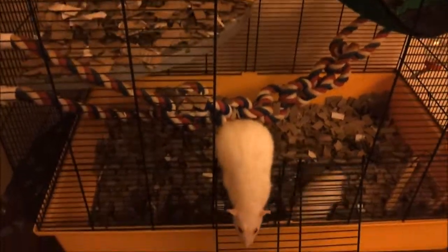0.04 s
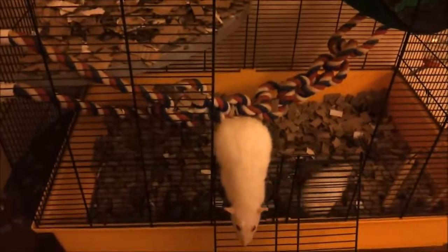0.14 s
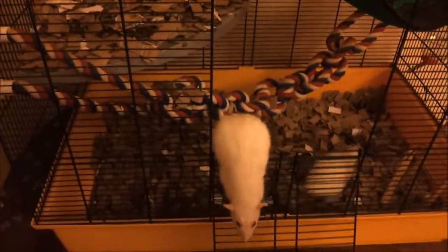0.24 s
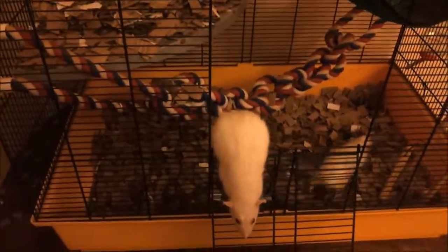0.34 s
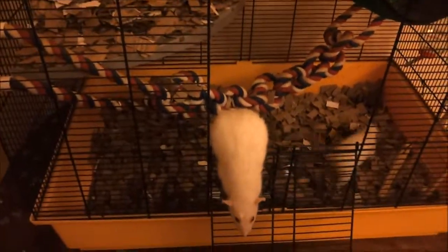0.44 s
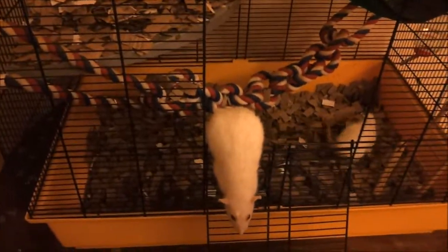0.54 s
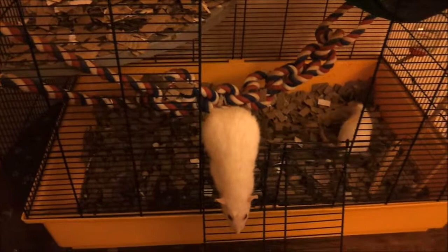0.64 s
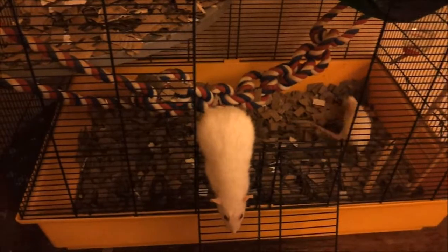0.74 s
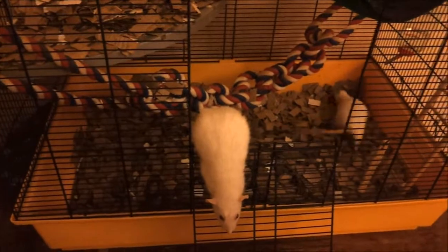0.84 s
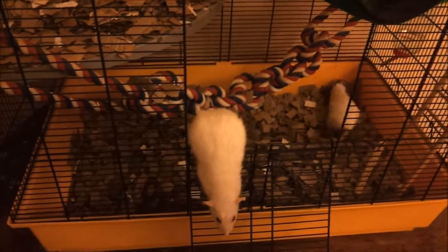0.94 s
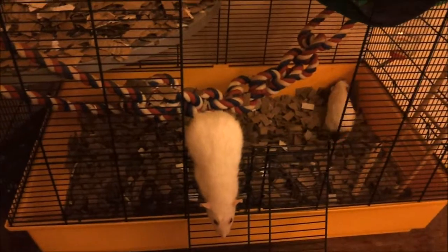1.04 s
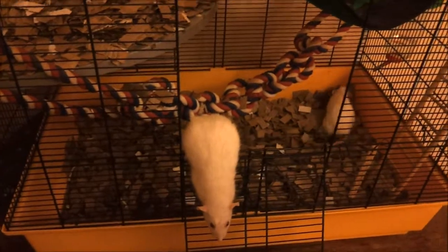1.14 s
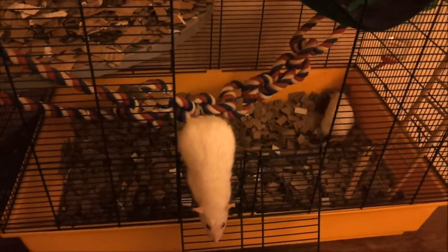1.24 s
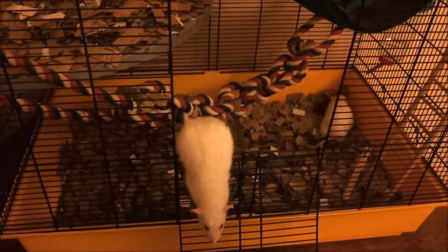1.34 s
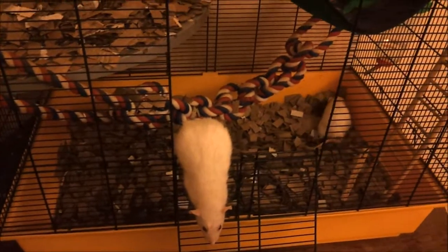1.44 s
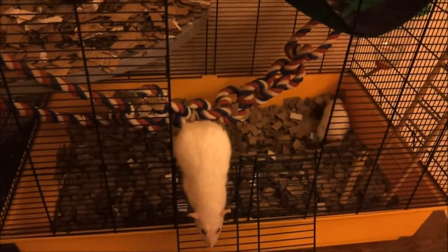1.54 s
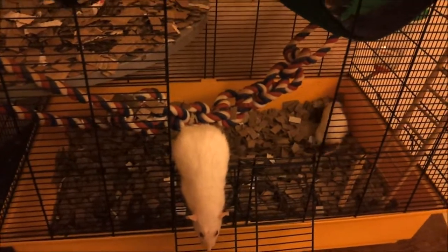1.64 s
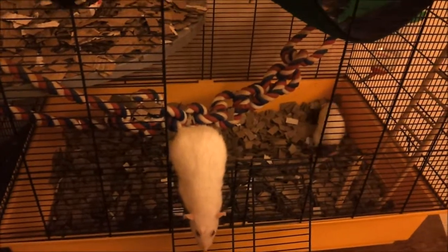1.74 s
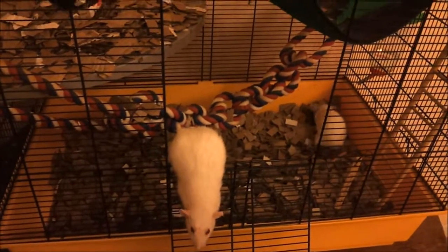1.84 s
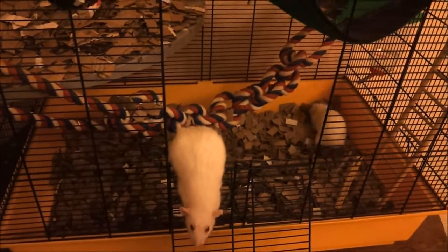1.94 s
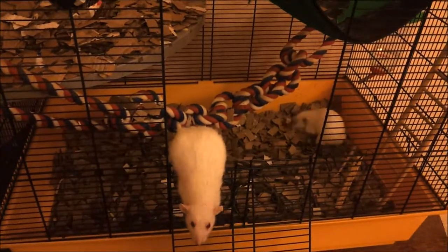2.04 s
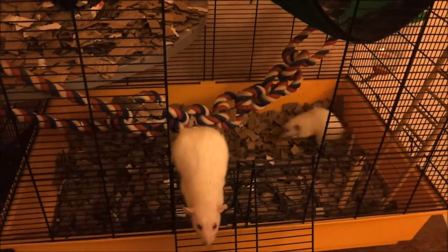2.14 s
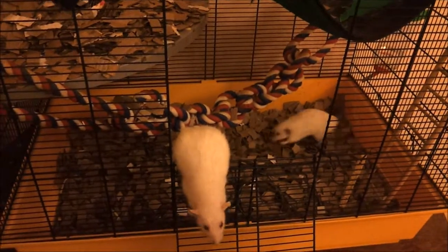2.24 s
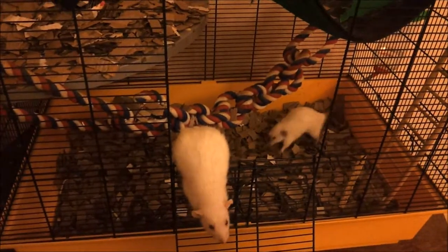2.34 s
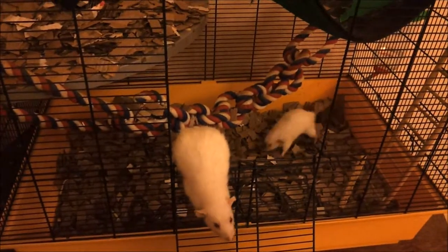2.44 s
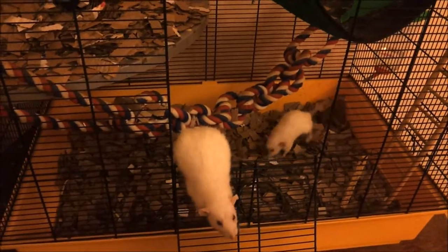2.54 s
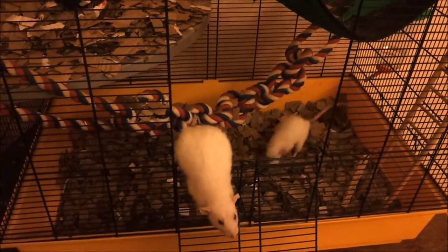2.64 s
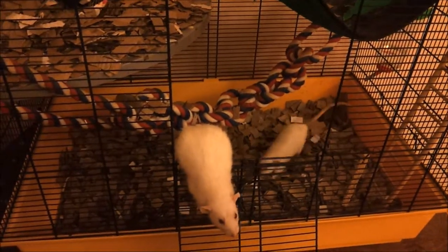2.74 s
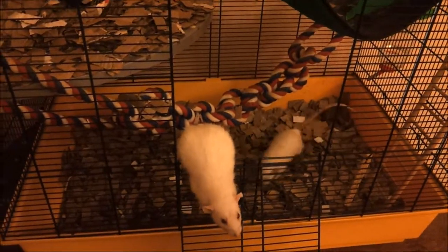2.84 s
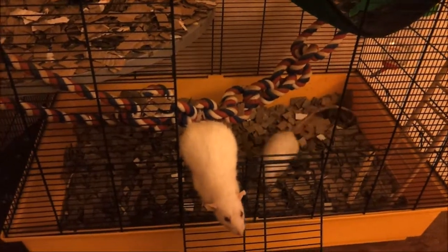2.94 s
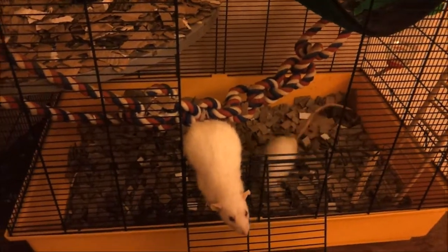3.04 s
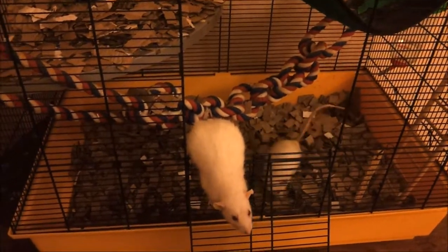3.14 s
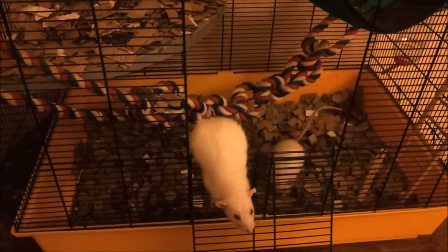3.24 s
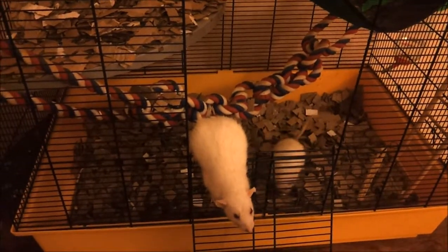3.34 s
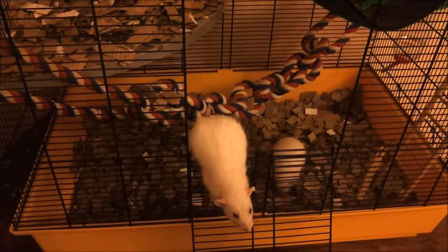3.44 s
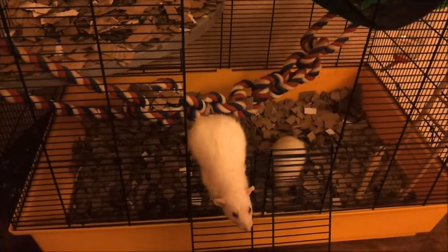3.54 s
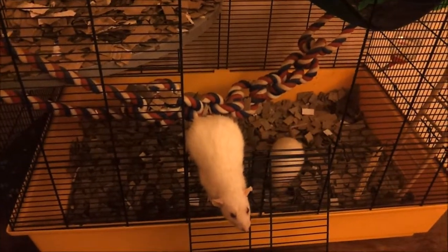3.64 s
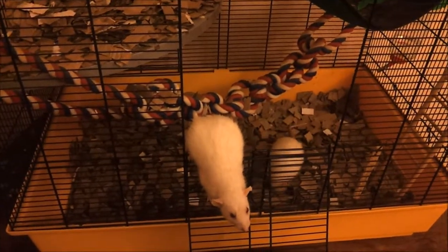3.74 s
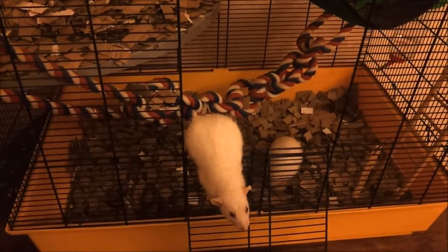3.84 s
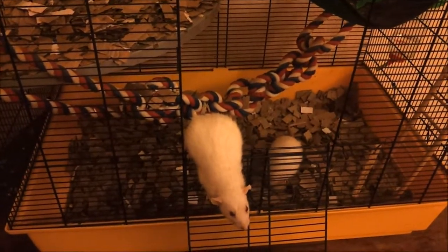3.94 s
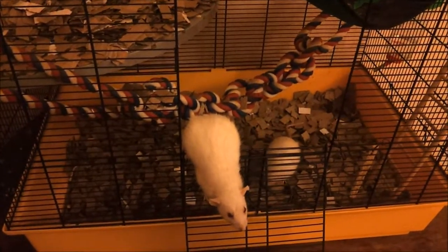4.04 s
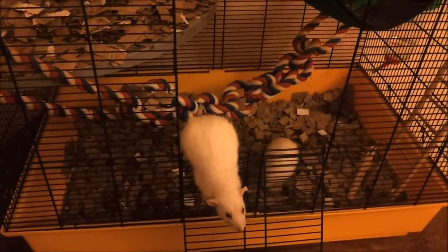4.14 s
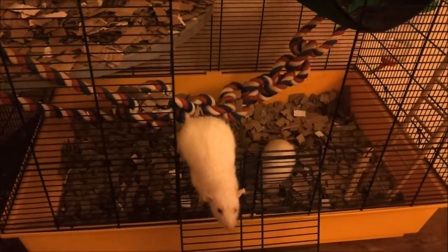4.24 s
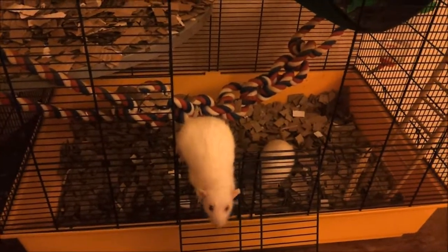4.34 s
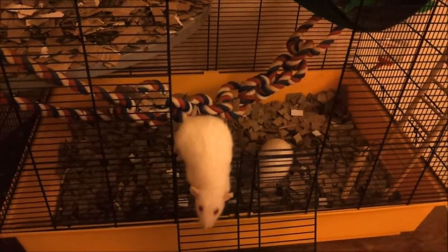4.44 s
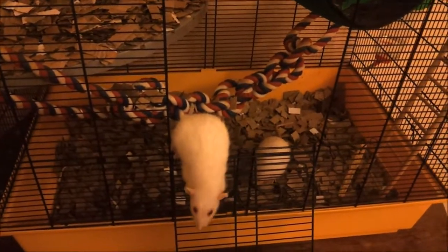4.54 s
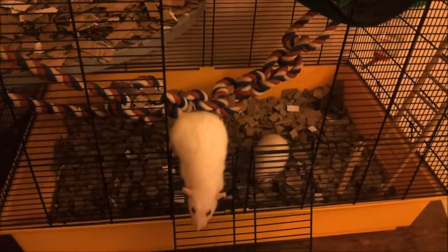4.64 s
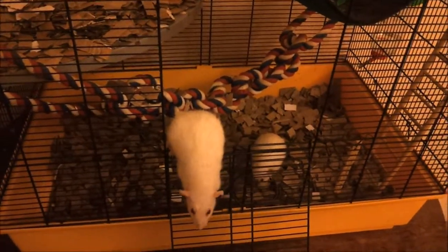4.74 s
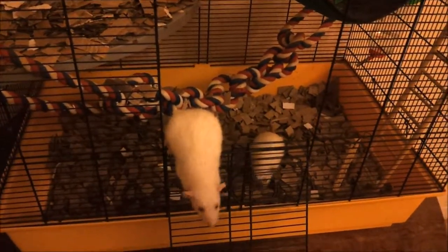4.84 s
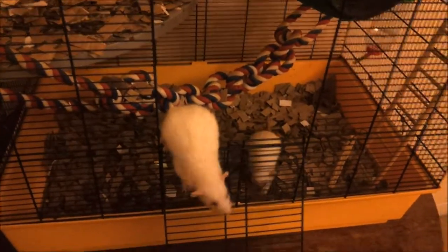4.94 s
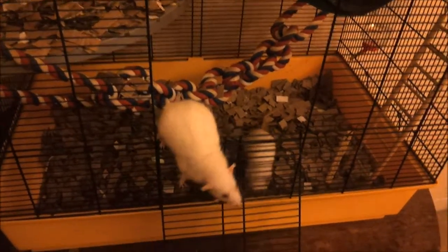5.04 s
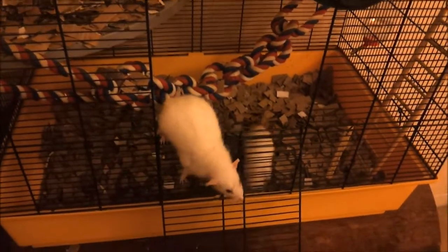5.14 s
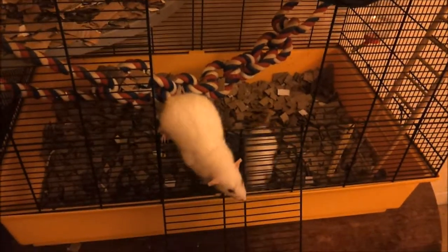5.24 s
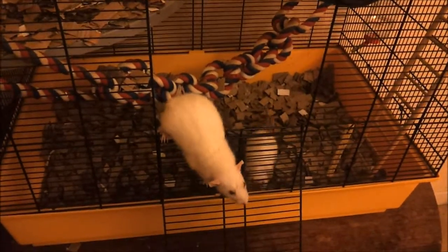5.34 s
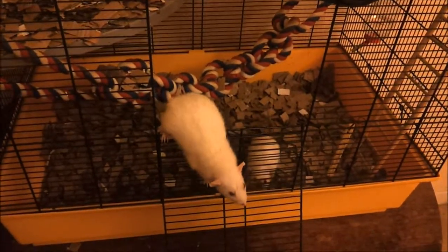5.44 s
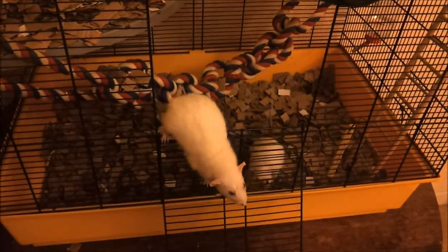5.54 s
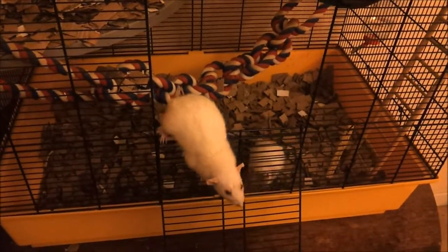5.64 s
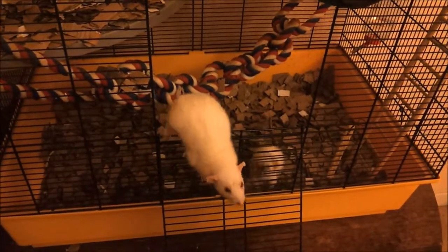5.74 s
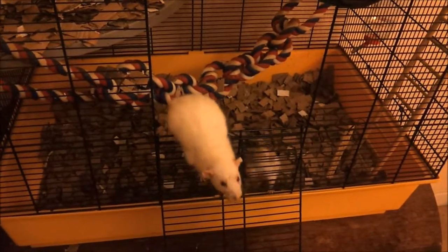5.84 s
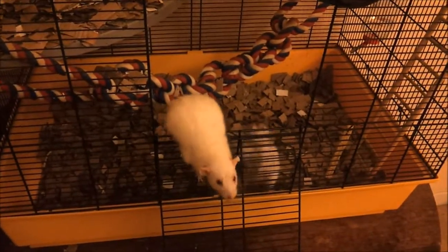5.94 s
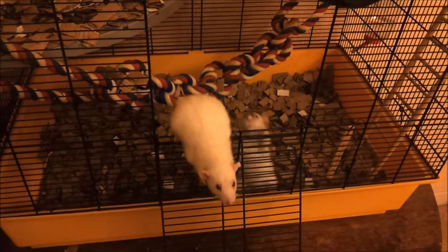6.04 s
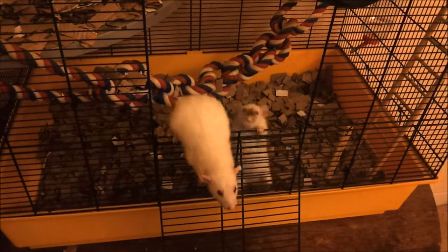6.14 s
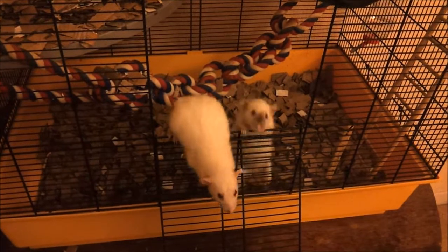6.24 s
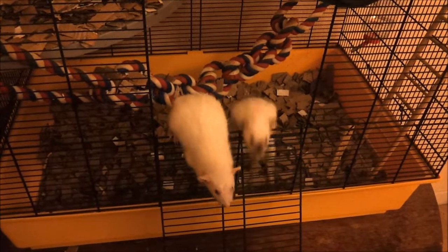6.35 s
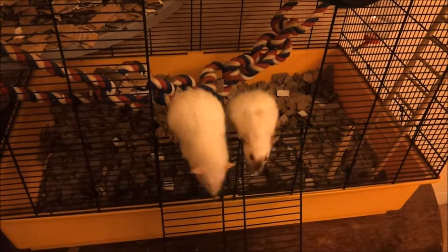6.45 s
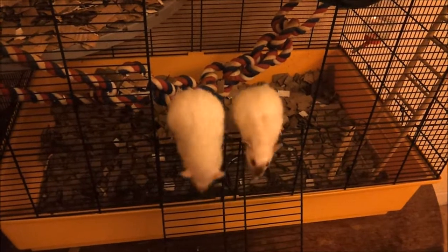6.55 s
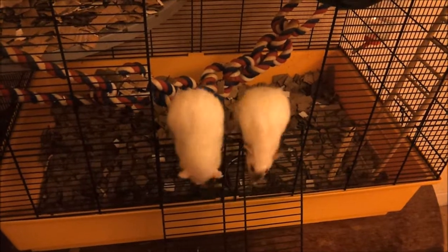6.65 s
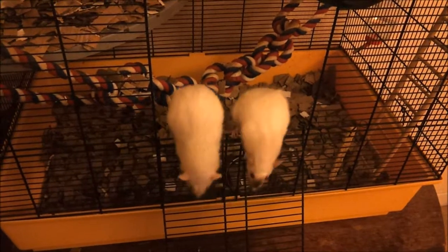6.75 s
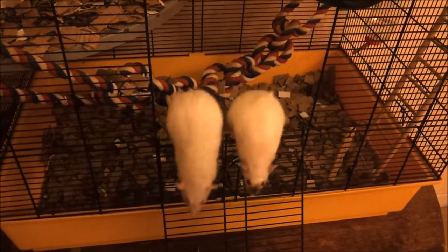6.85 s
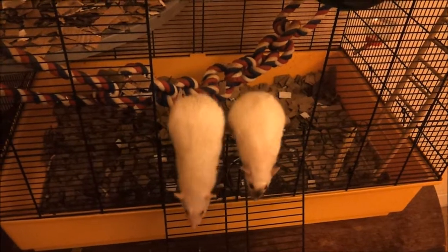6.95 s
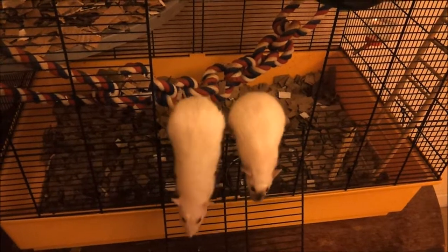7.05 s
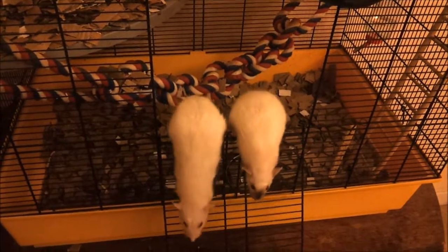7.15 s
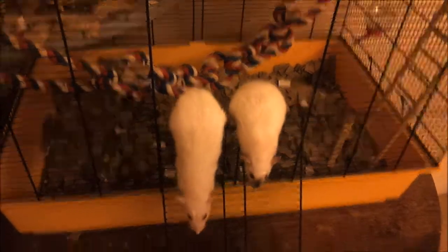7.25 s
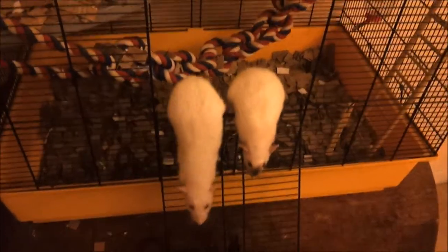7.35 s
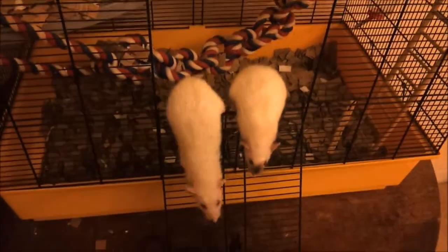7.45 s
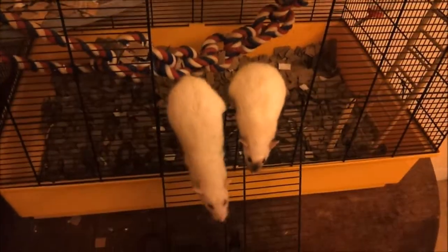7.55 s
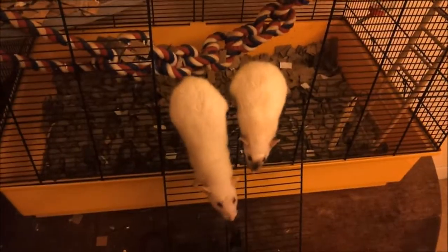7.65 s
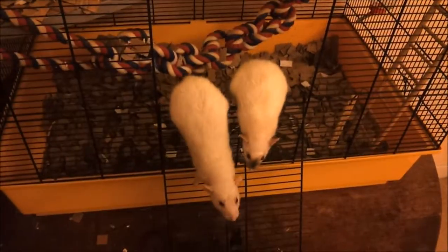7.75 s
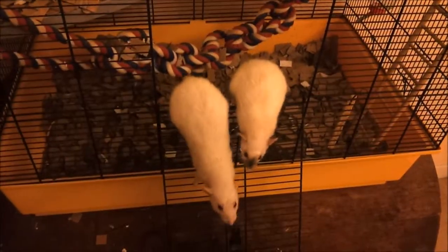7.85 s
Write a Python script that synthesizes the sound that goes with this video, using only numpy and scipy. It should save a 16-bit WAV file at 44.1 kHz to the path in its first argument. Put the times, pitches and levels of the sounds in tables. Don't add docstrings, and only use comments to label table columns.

```python
import sys
import numpy as np
from scipy import signal
from scipy.fft import rfft, irfft
from scipy.io import wavfile
from scipy.ndimage import uniform_filter1d

SR = 44100
rng = np.random.default_rng(int(sys.argv[2]) if len(sys.argv) > 2 else 0)


def put_to_file(sound):
    columns = np.atleast_2d(sound).T
    safe = np.clip(columns, -1, 1)
    whole_steps = np.round(safe * 32767)
    wavfile.write(sys.argv[1], SR, whole_steps.astype(np.int16))


def field_ratio(decibels):
    return 10 ** (np.asarray(decibels, dtype=float) / 20)


N = 348390

# (frequency [Hz], level [dB per Hz])
CHIP_COLOUR = [(900, -31), (1700, -14.5), (3100, -14.5), (3600, -11), (4100, -7.5), (6000, -3.5),
               (7000, -7.5), (9000, -9.5)]


def evened(x):
    return x / np.sqrt(np.mean(x ** 2) + 1e-20)


def add(mix, s, sound):
    part = mix[round(s * SR):][:len(sound)]
    part += sound[:len(part)]


def coloured(x, points):
    f, db = np.transpose(points)
    hz = np.fft.rfftfreq(len(x), 1 / SR)
    gain_db = np.interp(np.log(hz + 1), np.log(f + 1), db)
    return irfft(rfft(x) * field_ratio(gain_db), len(x))


def column(table, index):
    return np.interp(np.arange(N) / SR, [row[0] for row in table], [row[index] for row in table])


def wander(width):
    return evened(uniform_filter1d(uniform_filter1d(rng.standard_normal(N), width), width))


def crackle(per_s, spread_db):
    size = field_ratio(spread_db * np.minimum(rng.exponential(1, N), 5))
    sign = rng.choice([-1., 1.], N)
    return evened(size * sign * (rng.random(N) < per_s / SR))


def drone(table):
    turns = np.cumsum(column(table, 1) * (1 + .04 * wander(3000))) / SR
    return np.sqrt(2) * field_ratio(column(table, 2) - 0.6) * np.sin(2 * np.pi * turns)


def room():
    # (frequency [Hz], level [dB per Hz])
    hush = [(12, -42.5), (20, -7), (31, -4), (54, -5), (113, -3.5), (185, -5), (262, -6.5), (452, -8.5),
            (511, -10.5), (860, -11), (949, -12.5), (2490, -18.5), (5230, -21), (6540, -29.5), (7400, -35),
            (9620, -61), (16300, -120)]
    # (frequency [Hz], width [Hz], level [dB])
    room_modes = [
        (121.4, 13, -64.5),
        (190.3, 15, -64.5),
    ]
    # (time [s], pitch [Hz], level [dB])
    low_engine = [(0, 53.8, -62), (1.93, 48.9, -61.5), (2.15, 44.8, -66.5), (3.2, 45.6, -63.5),
                  (3.5, 45.6, -60), (4.2, 44.8, -67), (4.42, 44.4, -56), (4.7, 43.6, -62), (5.1, 41.8, -51),
                  (5.45, 43.8, -60), (5.6, 43.2, -70), (5.87, 44.1, -58.5), (6.25, 43.5, -59.5),
                  (6.4, 48.3, -66), (7.3, 50.3, -67), (7.9, 42, -70)]
    high_engine = [(0, 66, -67), (1.9, 68, -67), (2.2, 71, -68), (3.0, 69, -58), (3.25, 70, -65),
                   (3.5, 71, -58), (3.9, 68, -75), (4.15, 68, -56), (4.5, 68, -65), (5.6, 69, -65),
                   (6.3, 71, -75), (7.15, 72, -61), (7.4, 71, -66), (7.66, 70, -52), (7.9, 70.7, -67)]
    hush_db = -52
    out = field_ratio(hush_db - 1.92) * evened(coloured(rng.standard_normal(N), hush))
    for hz, width, db in room_modes:
        b, a = signal.iirpeak(hz, hz / width, SR)
        out += field_ratio(db) * evened(signal.lfilter(b, a, rng.standard_normal(N)))
    return out + drone(low_engine) + drone(high_engine)


def fills():
    # (time [s], lower edge [Hz], upper edge [Hz])
    swells = [(1.675, 6200, 7600), (2.07, 6200, 7600), (2.165, 6200, 7600), (2.955, 5100, 7000),
              (3.65, 4600, 5800), (4.49, 6200, 7500), (4.765, 5700, 7000), (4.885, 6200, 7600),
              (5.37, 5140, 6300), (7.0, 6920, 7600), (7.555, 4600, 6300)]
    level_db, length = -69, 2048
    out, envelope = np.zeros(N), np.sin(np.pi * np.arange(length) / length)
    for s, lo_hz, hi_hz in swells:
        edges = [(.97 * lo_hz, -80), (lo_hz, 0), (hi_hz, 0), (1.01 * hi_hz, -80)]
        band = coloured(rng.standard_normal(length), edges)
        add(out, s - .023, field_ratio(level_db) * envelope * evened(band))
    return out


def bumps():
    # (time [s], peak level [dB], pitch [Hz], length [cycles])
    touches = [(4.95, -30.5, 243, 0.74), (5.058, -39.5, 221.5, 1.6), (5.089, -41.5, 228, 1.2),
               (6.822, -44, 169, 1.2), (7.2277, -42, 239, 1.1), (7.2534, -40.5, 374, 2.3),
               (7.274, -36, 330, 0.96), (7.297, -41, 240, 1), (7.3011, -33.5, 350, 0.6),
               (7.324, -47, 262, 1.2), (7.388, -40, 300, 1), (7.4, -26.5, 237, 1),
               (7.401, -30.5, 690, 0.71), (7.2655, -43, 262, 1), (7.285, -46, 200, 1.1),
               (7.3285, -42, 330, 1.1), (7.37, -49, 300, 1.1)]
    out, t = np.zeros(N), np.arange(1500) / SR
    for s, db, hz, cycles in touches:
        swing = np.sin(2 * np.pi * hz * t) * np.exp(-(hz * t / cycles) ** 3)
        add(out, s, field_ratio(db) * swing)
    return out


def knocks():
    # (time [s], peak level [dB], centre of the struck modes [Hz], ring [factor on the decay])
    blows = [(1.449, -40, 2280, 0.62), (2.414, -41, 1530, 0.69), (2.421, -47, 1460, 0.7),
             (2.425, -44, 200, 0.85), (2.43, -27, 2100, 0.66), (2.456, -38, 357, 0.56),
             (3.093, -35, 790, 0.4), (3.104, -43.5, 744, 0.36), (3.121, -39.5, 253, 0.6),
             (5.65, -42, 389, 1), (5.679, -36.5, 500, 1), (5.88, -32, 1300, 0.6), (5.892, -35.5, 390, 2.1),
             (5.937, -37, 990, 0.5), (5.978, -34.5, 2200, 1), (5.979, -41, 900, 0.34),
             (6.045, -39, 1500, 0.34), (6.052, -36, 700, 0.44), (6.3805, -17.5, 1330, 0.5),
             (6.381, -30, 2900, 0.35), (6.384, -28, 184, 0.22), (6.383, -19.5, 415, 0.34),
             (6.386, -21.5, 900, 0.38), (6.385, -25, 616, .6), (6.396, -31, 560, 0.84),
             (6.424, -37, 560, 0.67), (6.402, -27.5, 420, 0.43), (6.412, -34, 850, .7),
             (6.422, -41, 1070, 0.99), (6.636, -40, 2300, 0.63), (6.407, -34.5, 180, .3),
             (6.432, -43, 1550, 0.89), (6.442, -34, 1050, .6), (6.452, -45, 300, 0.89),
             (6.472, -45, 704, 0.76), (6.487, -48.5, 563, 0.66), (6.494, -42, 170, 0.39),
             (5.4, -45.5, 333, 1.7), (5.52, -44, 407, 1.4), (5.664, -38, 2070, 1.1), (5.674, -42, 760, .8)]
    # (frequency [Hz], level [dB], t60 [s])
    door_modes = [(143, -4, 0.31), (189, 0, 0.14), (300, -9, 0.049), (404.5, -8.5, 0.19),
                  (499, -10.5, 0.11), (559, -7, 0.063), (674, -4.5, 0.034), (760, -12.5, 0.087),
                  (847, -5, 0.06), (1016, -9, 0.085), (1275, -7, 0.034), (1370, -6.5, 0.026),
                  (1480, -13.5, 0.031), (1650, -5, 0.033), (1960, -4, 0.028), (2080, -9, 0.047),
                  (2177, -4, 0.042), (2640, -4, 0.067), (3090, -5, 0.049), (3420, 2, 0.048)]
    out, t = np.zeros(N), np.arange(9000) / SR
    hz, mode_db, t60 = np.transpose(door_modes)[:, :, None]
    for s, db, centre_hz, ring in blows:
        spot = rng.standard_normal((len(door_modes), 3))
        weight_db = mode_db - 7.3 * np.log2(hz / centre_hz) ** 2 + 1.3 * spot[:, :1]
        loaded_hz = hz * (1 + .015 * spot[:, 1:2])
        decay = field_ratio(weight_db - 60 * t / (t60 * max(ring, .05)))
        modes = decay * np.sin(2 * np.pi * loaded_hz * t + 2 * spot[:, 2:])
        contact = np.minimum(t * centre_hz / 0.69, 1)
        blow = modes.sum(axis=0) * contact
        add(out, s, field_ratio(db) * blow / abs(blow).max())
    return out


def paws(index):
    # (time of the push [s], rustle level [dB], length [s], level of drag on the tray [dB])
    pushes = [(0.238, -39, 0.14, -50), (0.347, -37, 0.064, -48), (0.454, -39, 0.045, -58),
              (0.523, -38, .09, -52), (0.605, -43.5, 0.14, -64), (0.677, -43, 0.077, -54),
              (0.756, -53, 0.049, -62), (0.872, -42, .13, -54), (0.977, -43.5, 0.091, -56),
              (1.315, -41, 0.095, -56), (1.338, -42, 0.025, -55), (0.273, -44, .04, -59),
              (0.2, -47, .06, -54), (1.457, -45, 0.045, -67), (1.545, -49, .07, -59),
              (1.969, -51.5, .05, -65), (2.103, -50.5, .04, -61), (2.222, -45.5, 0.084, -54),
              (2.349, -71, 0.049, -55), (2.429, -34, 0.061, -47), (2.57, -43, 0.033, -54),
              (2.618, -39, 0.017, -48.5), (2.699, -37.5, 0.098, -49.5), (2.742, -41, 0.071, -49.5),
              (2.822, -41.5, 0.085, -57), (2.914, -44, 0.077, -63), (3.062, -42, 0.05, -54),
              (3.121, -43, 0.11, -47), (3.572, -52.5, 0.093, -59),
              (4.964, -52, 0.16, -55.5), (5.17, -51.5, 0.21, -54), (5.41, -49, .05, -54),
             (5.652, -56, 0.13, -45.5), (5.676, -35, 0.066, -41), (5.894, -39.5, 0.055, -47),
             (5.938, -36.5, 0.02, -44), (5.984, -40.5, 0.14, -46.5), (6.073, -48.5, 0.11, -55.5),
             (6.358, -47, 0.032, -49), (6.378, -39, .04, -50), (6.418, -47, 0.13, -43),
             (6.638, -57.5, 0.22, -52), (7.395, -64, 0.089, -51)]
    rise_share = 0.45
    t = np.arange(0, N / SR + .002, .001)
    steps = np.array(pushes).T[:, :, None]
    push, length = steps[0], steps[2]
    away = np.maximum((push - t) / rise_share, (t - push) / (1 - rise_share)) / length
    level = np.linalg.norm(field_ratio(steps[index] - 10 * away), axis=0)
    return np.interp(np.arange(N) / SR, t, level)


def drag():
    # (frequency [Hz], level [dB per Hz])
    tray_colour = [(90, -35.5), (180, -8.5), (400, -3), (700, -8.5), (1050, -6.5), (1550, -15),
                   (2200, -15.5), (3000, -19.5), (4500, -57.5)]
    idle_db = -60.5
    slips = crackle(per_s=2500, spread_db=1.5)
    return field_ratio(-6.5) * np.hypot(field_ratio(idle_db), paws(3)) * evened(coloured(slips, tray_colour))


def rustle():
    # (time [s], rustle level [dB])
    stir = [(0.0, -51), (0.13, -49), (0.72, -52.5), (1.06, -57.5), (1.22, -51), (1.61, -62), (2.12, -57.5),
            (2.5, -53.5), (3.0, -52), (3.25, -61), (3.52, -55), (3.63, -62), (4.07, -64), (4.86, -61.5),
            (5.24, -64.5), (5.59, -51), (5.85, -55), (6.16, -64.5)]
    grains = crackle(per_s=6000, spread_db=1.3) * field_ratio(1.6 * wander(300))
    return field_ratio(-2.5) * np.hypot(field_ratio(column(stir, 1)), paws(1)) * evened(coloured(grains, CHIP_COLOUR))


def snaps():
    # (time [s], peak level [dB], pitch [Hz], low tick relative to the peak [dB])
    clean_snaps = [(0.0463, -28, 5400, -33), (0.504, -31.5, 5900, -18), (0.5135, -30, 4390, -23),
                   (0.528, -31, 4750, -20), (0.5378, -25, 5740, -25), (0.5547, -24, 5950, -14),
                   (0.624, -34.5, 5920, -25), (0.9585, -31, 6800, -18), (0.9647, -43.5, 5900, -22),
                   (0.2705, -38, 6270, -20), (0.356, -38.5, 5800, -16), (0.2195, -37, 4270, -20),
                   (0.495, -36.5, 6450, -18), (0.588, -39, 5700, -20), (0.6117, -40, 6150, -8),
                   (0.738, -40, 5000, -10), (0.8395, -42, 5100, -15), (1.344, -38, 5900, -19),
                   (1.66, -51, 6040, -14), (1.805, -45.5, 5000, -22), (3.0405, -37, 4570, -1),
                   (3.598, -47, 3500, -5), (5.9825, -36, 6080, -9), (6.356, -37, 6150, -21),
                   (6.363, -38.5, 3500, -24), (1.1133, -42.5, 5080, -14), (1.4505, -37, 6440, -1),
                   (1.485, -28, 6930, -27), (1.7978, -43, 6040, -13), (2.3448, -39, 5970, -28),
                   (2.351, -37, 5400, -20), (2.4668, -37, 5780, -1), (2.7025, -32, 5650, -24),
                   (2.7102, -30, 6200, -20), (4.789, -44.5, 5360, -8), (4.986, -37, 6520, -25),
                   (5.6135, -37, 5180, -8), (5.9765, -31.5, 3760, -21), (6.3855, -38, 6050, -20)]
    soft_folds = [(0.301, -26, 5240, -21), (.339, -29, 4200, -25), (.31, -34, 5800, -25),
                  (0.451, -25.5, 4600, -27), (0.5063, -29, 5600, -22), (0.6783, -31.5, 5970, -1),
                  (0.761, -32, 5670, -20), (1.6516, -42.5, 4500, -6), (2.049, -40.5, 5500, -14),
                  (2.4284, -27.5, 4970, -19), (2.6175, -24.5, 6400, -7), (2.917, -25, 5470, -10),
                  (3.039, -31, 6560, -7), (3.437, -36, 6580, -17), (3.574, -39.5, 3060, -2),
                  (4.027, -38, 5000, -2), (5.677, -22, 4380, -10), (5.701, -28.5, 5070, -28),
                  (5.936, -28, 6080, -3), (6.6354, -43.5, 4500, -4), (7.4, -38.5, 3500, -5)]
    crushed = [(0.165, -35, 6180, -12), (0.2385, -29, 4890, -6), (0.3264, -42, 5310, -19),
               (0.345, -32, 5700, -21), (0.428, -39, 5310, -18), (0.8599, -33, 6660, -14),
               (1.3178, -33.5, 6230, -15), (1.4253, -33, 6600, -12), (1.445, -42, 5280, -9),
               (2.418, -26, 4770, -13), (2.661, -32, 5900, -19), (2.888, -32.5, 5740, -25),
               (4.971, -38, 5970, -18), (5.004, -38, 5700, -10), (5.1783, -39, 6530, -17),
               (5.889, -34, 5000, -20), (5.897, -34, 6500, -20), (5.9084, -33, 5400, -2),
               (6.0839, -34.5, 6040, -20), (6.339, -40.5, 6800, -25), (6.348, -34, 5330, -22),
               (6.3634, -37, 4950, -25)]
    pings = [(0.2385, -52, 2100, -20), (0.9595, -50.5, 2080, -19), (2.412, -51, 1450, -20),
             (2.4223, -40.5, 1480, -20), (2.424, -36, 4910, -22), (5.8893, -38.5, 3940, -18),
             (5.899, -41, 3870, -22), (5.937, -44.5, 1080, -10), (5.9773, -39.5, 2200, -3),
             (5.978, -48, 1007, -17), (6.0445, -50, 1600, -17), (5.983, -42, 2230, -18),
             (6.38, -34.5, 1344, -18), (6.417, -36, 1014, -20)]
    strikes = [(6.3786, -23.5, 6300, -10), (6.3796, -27.5, 3290, -8), (6.3807, -21, 4946, -16),
               (6.3825, -26, 4580, -10)]
    # (settling time [s], crack level [dB], ring t60 [s], rise [s], side partials [dB])
    kinds = [
        (0.033, -0.5, 0.0026, 0.00039, -9),
        (.04, -9, 0.0041, 0.001, -3.5),
        (0.063, -8, 0.0071, .0016, -6),
        (0.048, 4, 0.018, .0008, -10.5),
        (.014, 1, 0.0047, 0.00036, -7),
    ]
    # (frequency [ratio to its pitch], level [dB])
    partials = [(.79, -5.5), (.89, -3), (1.14, -2.5)]
    out, t = np.zeros(N), np.arange(5000) / SR
    settling = evened(coloured(crackle(per_s=7000, spread_db=2.5), CHIP_COLOUR))
    tables = (clean_snaps, soft_folds, crushed, pings, strikes)
    for table, (settle, crack_db, ring, rise, side_db) in zip(tables, kinds):
        for s, db, hz, low_db in table:
            chord = np.sin(2 * np.pi * hz * t)
            for ratio, partial_db in partials:
                chord += field_ratio(side_db + partial_db) * np.cos(2 * np.pi * hz * ratio * t + hz)
            crack = chord * field_ratio(-60 * np.maximum(t - rise, 0) / ring) * np.minimum(t / rise, 1)
            tick = np.sin(2 * np.pi * 2100 * t) * field_ratio(low_db + 4.0 - 60 * t / 0.0019)
            start = round(s * SR) % (N - len(t))
            shuffle = settling[start:start + len(t)] * field_ratio(-11.5 - 60 * t / settle)
            shuffle *= np.minimum(t / (0.042 * settle), 1)
            add(out, s + .0006, field_ratio(db) * (field_ratio(crack_db) * (crack + tick) + shuffle))
    return out


def cage(x, t60, tail_db, echo_db, count=3):
    # (delay [s], level [dB])
    wall_echoes = [(.0017, -10.5), (.0035, -13), (.0072, -18), (.011, -14.5)]
    t, out = np.arange(6000) / SR, np.zeros(N)
    turn = 2 * np.pi * 4.3 * np.arange(N) / SR
    for k in range(count):
        response = rng.standard_normal(len(t)) * field_ratio(-60 * t / t60) * np.minimum(t / 0.0096, 1)
        response *= field_ratio(tail_db) / np.linalg.norm(response)
        response[0] = 1
        for s, db in wall_echoes:
            add(response, s * rng.uniform(.75, 1.1), field_ratio(db + echo_db) * np.ones(1))
        share = np.sqrt(2 / count) * abs(np.cos(turn + k * np.pi / count))
        out += signal.oaconvolve(x * share, response / np.linalg.norm(response))[:N]
    return out / 0.89


def scene():
    bedding = cage(rustle() + field_ratio(2.0) * snaps(), t60=0.07, tail_db=-8.5, echo_db=2.0)
    frame = cage(drag() + field_ratio(-4.0) * knocks(), t60=0.37, tail_db=-5.0, echo_db=-8.0)
    frame = coloured(frame, [(70, -28.0), (150, -0.5)])
    mono = bedding + frame + bumps() + room()
    return np.array([mono, mono])


def low_pass(x):
    return signal.sosfilt(signal.butter(12, 8280, fs=SR, output="sos"), x)


def record(dry):
    # (frequency [Hz], level [dB])
    microphone = [(6800, 0.5), (7200, -3.5), (7600, -12), (8000, -29), (8300, -43), (8700, -70),
                  (9500, -100)]
    limited = 0.21 * np.tanh(dry / 0.24)
    narrow = np.array([coloured(channel, microphone) for channel in limited])
    narrow += np.outer([1, -1], fills())
    return low_pass(narrow)


dry = scene()
out = record(dry)
put_to_file(out)
```